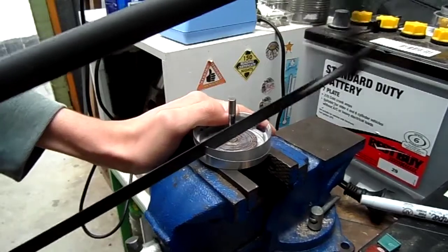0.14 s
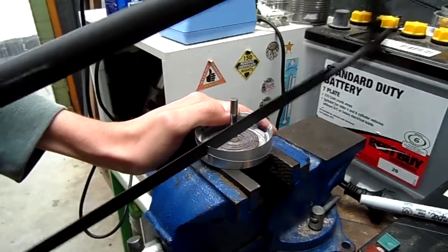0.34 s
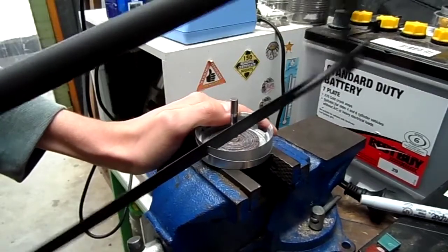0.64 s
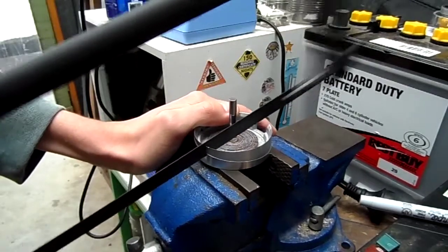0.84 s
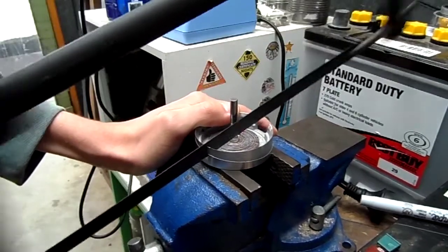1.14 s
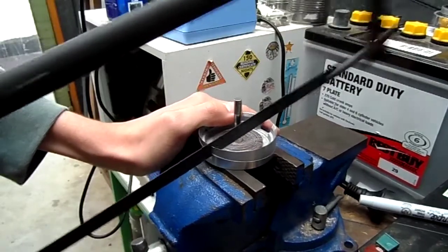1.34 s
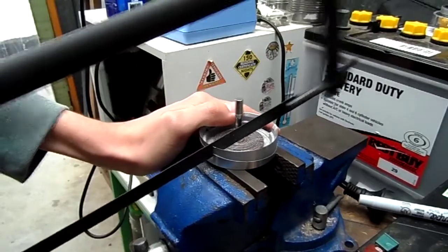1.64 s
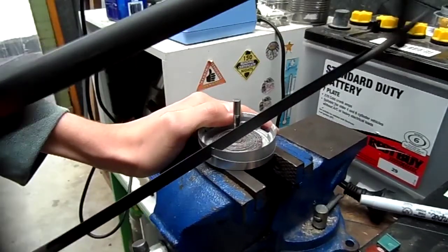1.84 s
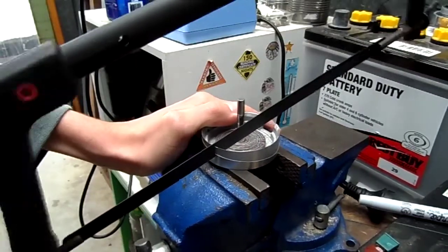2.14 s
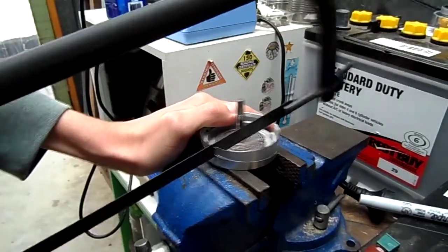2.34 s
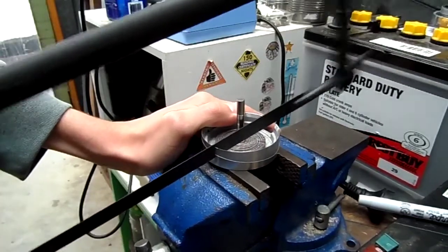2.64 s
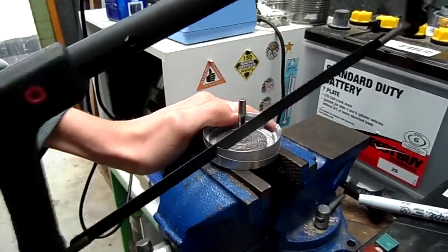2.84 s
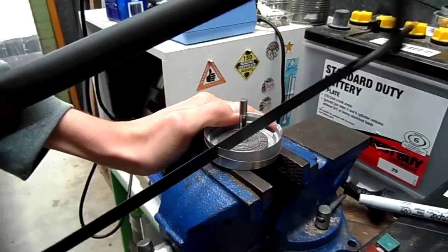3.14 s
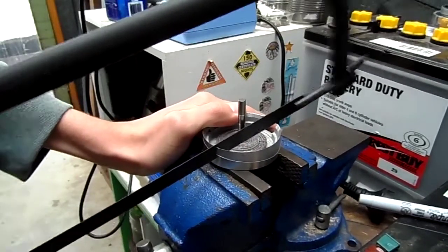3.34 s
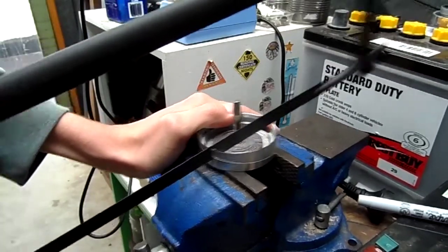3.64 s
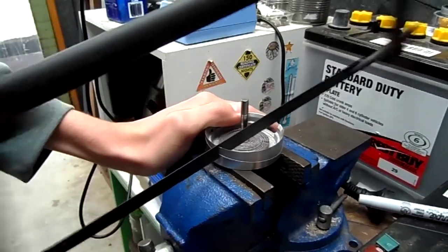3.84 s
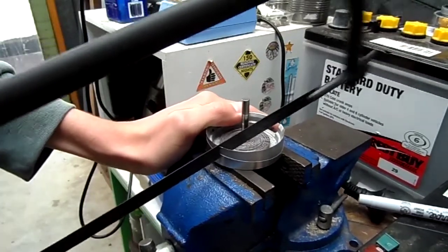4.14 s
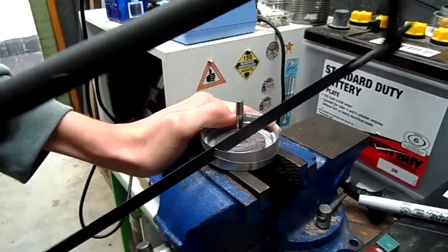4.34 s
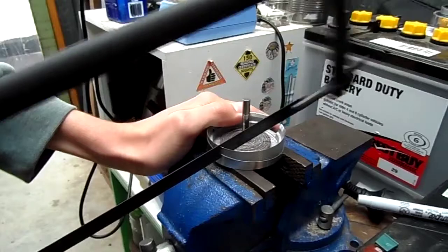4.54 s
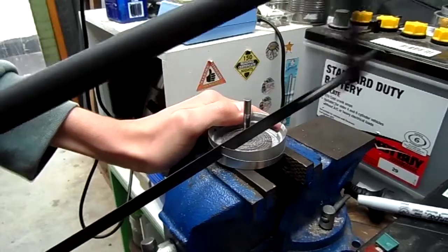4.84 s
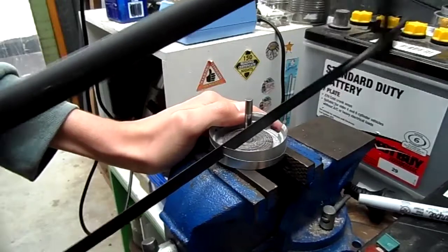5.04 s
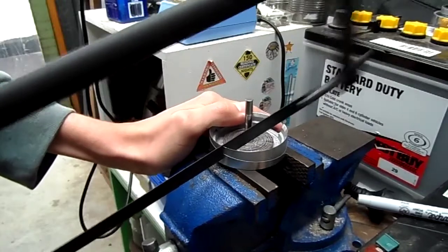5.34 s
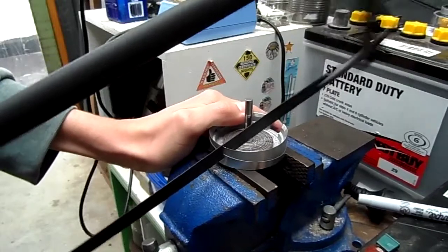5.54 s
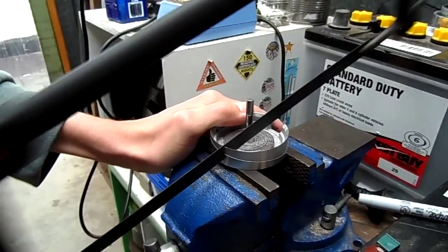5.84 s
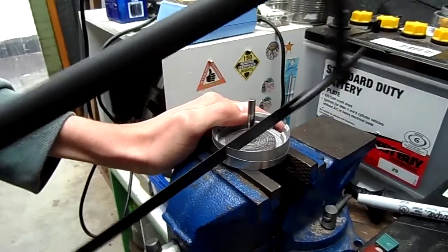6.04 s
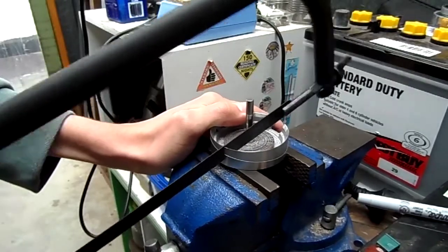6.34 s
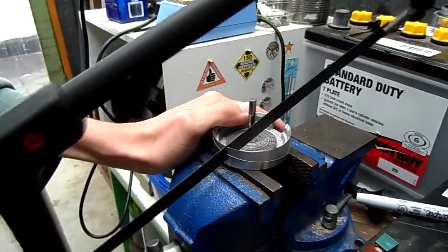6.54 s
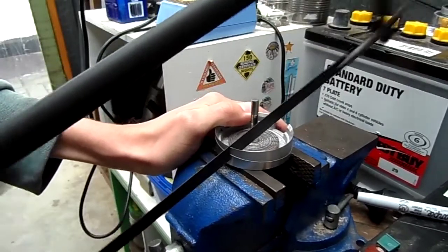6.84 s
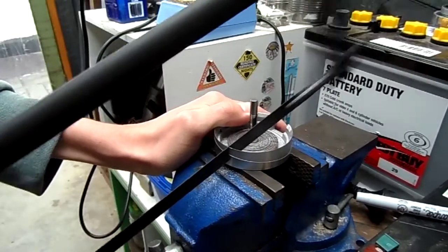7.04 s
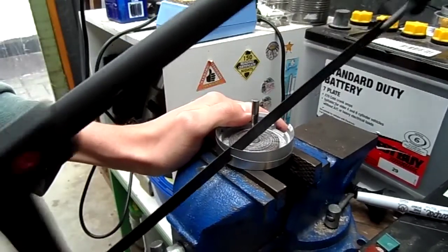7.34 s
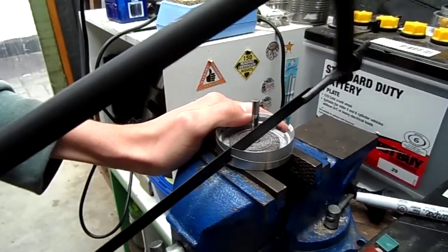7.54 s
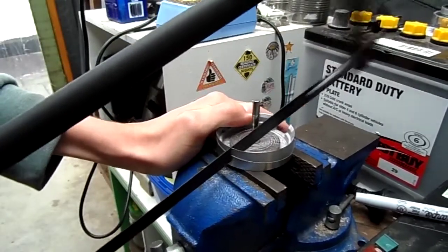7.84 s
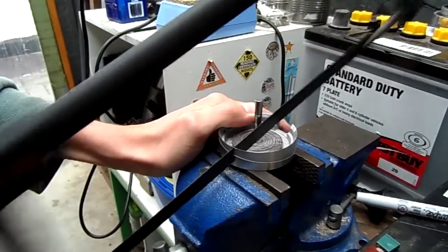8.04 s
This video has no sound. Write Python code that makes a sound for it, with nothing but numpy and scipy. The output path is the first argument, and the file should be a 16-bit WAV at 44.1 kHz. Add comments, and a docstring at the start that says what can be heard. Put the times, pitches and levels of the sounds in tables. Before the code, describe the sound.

From 0 s a hand hacksaw strokes quickly across a small metal drum clamped in a vise, roughly five to six single strokes a second, heard close in a small workshop with a short, faint echo. Every stroke is a bright gritty rasp that swells and fades within about 0.2 s, the blade's ring sliding up on pushes and down on pulls. From 0.2 s the loose frame knocks at many turns, most strongly in the first 2.6 s, and brief hollow or higher squeaky tones sing out mid-stroke. Sudden bites jolt the scrape around 2.8 to 3.4 s and at 4.2 s. Low rumble of hands and bench swells near 3.6 s. Strokes soften around 4.2 to 4.5 s, then regain strength. Sawing carries on steadily, knocks mostly lighter, with rumble strongest as it cuts off mid-work just after 8 s.

```python
"""A hand hacksaw works quickly back and forth across a small metal drum held in a bench vise.
From the start a low handling rumble and faint shop air lie under the first stroke, whose passing
teeth scrape and ring the blade, frame and drum, with a short room echo. From the first turn on the
frame knocks at many turns; from the second stroke on, single modes often sing out as clear tones.
The rumble grows towards the middle and is strongest at the end, where the sawing still goes on."""
import sys
import numpy as np
from scipy import signal
from scipy.fft import rfft, irfft, next_fast_len
from scipy.io import wavfile
from scipy.ndimage import uniform_filter1d

SR = 44100
rng = np.random.default_rng(int(sys.argv[2]) if len(sys.argv) > 2 else 0)


def master(y):
    """Save y as 16-bit WAV."""
    cut = np.clip(np.atleast_2d(y).T, -1, 1)
    pcm = np.round(cut * 32767)  # scale
    wavfile.write(sys.argv[1], SR, pcm.astype(np.int16))


def convert_level_to_amplitude(level_db):
    """Map a level in decibels to its linear amplitude factor."""
    exponent = np.asarray(level_db, float) / 20
    return 10 ** exponent


N = 361179  # length [samples]


def evened(x):
    """Scales a signal to rms 1."""
    return x / np.sqrt(np.mean(x ** 2) + 1e-20)


def read(points, hz):
    """Reads a table of values over frequency, in even steps of pitch."""
    table_hz, value = np.transpose(points)
    return np.interp(np.log(hz + 1), np.log(table_hz + 1), value)


def add(mix, s, sound):
    """Mixes a sound in at time s [s]."""
    part = mix[max(round(s * SR), 0):][:len(sound)]
    part += sound[:len(part)]


def coloured(x, points):
    """Filters a signal by the spectrum of a table and scales it to rms 1."""
    size = next_fast_len(N)
    gain = convert_level_to_amplitude(read(points, np.fft.rfftfreq(size, 1 / SR)))
    return evened(irfft(rfft(x, size) * gain, size)[:N])


def resonate(x, hz, width):
    """Rings like one piece of metal at one pitch; white noise of rms 1 leaves with rms near 1."""
    r = np.exp(-np.pi * width / SR)
    ring = signal.lfilter([1], [1, -r * np.exp(2j * np.pi * hz / SR)], x).real
    return np.sqrt(2) * np.sqrt(1 - r ** 2) * ring


def wander(hz):
    """Slow chance of rms 1, changing about hz times a second."""
    size = max(round(SR / hz / 2), 1)
    noise = rng.standard_normal(N)
    return evened(uniform_filter1d(uniform_filter1d(noise, size), size))


# Rumble strength over time, before a steady lift and chance: (time [s], level [dB])
RUMBLE_LEVEL = [(0.0, -48), (0.5, -47), (0.98, -47), (1.189, -44.5), (2.12, -45.5), (2.9, -42.5),
                (3.01, -41.5), (3.65, -36), (4.08, -40), (4.63, -43), (4.931, -39.5), (5.41, -38),
                (6.59, -39), (6.91, -39.5), (8.05, -37.5), (8.19, -31)]
# Tone colour of the rumble: (frequency [Hz], relative level [dB per Hz])
RUMBLE_COLOUR = [(20, -2), (35, -8), (60, 1.5), (100, -3.5), (160, -9.5), (280, -13), (500, -20),
                 (1500, -84)]
# Tone colour of the air in the shop: (frequency [Hz], relative level [dB per Hz])
AIR_COLOUR = [(60, -10), (150, 0), (400, -5), (800, -10), (1500, -24), (4000, -38), (15000, -52)]


def rumble():
    """Lumpy low noise of hands and bench, with the faint air of the shop above it."""
    s, db = np.transpose(RUMBLE_LEVEL)
    lumps_db = 2.0 * wander(8)
    level_db = np.interp(np.arange(N) / SR, s, db) + lumps_db + 2.5
    low, air = rng.standard_normal((2, N))
    return convert_level_to_amplitude(level_db) * coloured(low, RUMBLE_COLOUR) + convert_level_to_amplitude(-49) * coloured(air, AIR_COLOUR)


# Saw strokes, pulls and pushes in turn, scrape level before the bites:
# (start [s], fastest moment [s], stop [s], scrape level [dB])
STROKES = [(0.0, .098, 0.19, -20), (.164, 0.277, .33, -19.5), (0.333, .414, .5, -18.5),
           (0.505, .607, .67, -19), (.664, 0.747, 0.86, -20), (.833, 0.935, 1.025, -19),
           (1.009, 1.091, 1.177, -18), (1.178, 1.287, 1.364, -19), (1.354, 1.453, 1.538, -20),
           (1.544, 1.624, 1.72, -20.5), (1.712, 1.798, 1.907, -18.5), (1.901, 1.965, 2.09, -18.5),
           (2.061, 2.164, 2.236, -19.5), (2.248, 2.344, 2.404, -18.5), (2.418, 2.52, 2.614, -19),
           (2.607, 2.717, 2.79, -19.5), (2.775, 2.884, 2.963, -19), (2.953, 3.054, 3.123, -18),
           (3.117, 3.219, 3.32, -19), (3.296, 3.416, 3.457, -18.2), (3.46, 3.569, 3.64, -20.5),
           (3.638, 3.74, 3.795, -18.5), (3.823, 3.917, 4, -18), (4.0, 4.082, 4.166, -20.5),
           (4.167, 4.256, 4.365, -24), (4.358, 4.475, 4.533, -24.5), (4.598, 4.665, 4.785, -21),
           (4.773, 4.902, 4.96, -20), (5.002, 5.062, 5.195, -18.5), (5.188, 5.315, 5.38, -21),
           (5.373, 5.473, 5.573, -18.5), (5.565, 5.659, 5.73, -19), (5.731, 5.806, 5.92, -19.5),
           (5.91, 6.008, 6.082, -20), (6.073, 6.154, 6.268, -19.5), (6.262, 6.388, 6.443, -19.5),
           (6.435, 6.539, 6.64, -19), (6.631, 6.73, 6.84, -20.5), (6.808, 6.94, 7.02, -22),
           (7.005, 7.11, 7.18, -20.5), (7.179, 7.289, 7.38, -19), (7.376, 7.522, 7.6, -20),
           (7.594, 7.709, 7.82, -22), (7.81, 7.917, 7.98, -19.5), (7.99, 8.092, 8.17, -18)]


def motion():
    """Turns strokes into arches of speed 0-1, scrape level, place on the blade 0-1 and direction."""
    rise_point, fall_point = 1.285, 1.67  # how pointed the scrape swells and dies
    t = np.arange(N) / SR
    speed, power, place, push = np.zeros((4, N))
    for k, (start, fastest, stop, db) in enumerate(STROKES):
        now = slice(round(start * SR), round(stop * SR))
        turn = np.pi * np.interp(t[now], [start, fastest, stop], [0, .5, 1])
        arch = np.abs(np.sin(turn))
        point = np.where(t[now] < fastest, rise_point, fall_point)
        power[now] += (convert_level_to_amplitude(db) * arch ** point) ** 2
        speed[now] = arch
        push[now] = k % 2
        place[now] = .5 - .5 * np.cos(turn) * (-1) ** k  # a pull runs 0 to 1, a push 1 to 0
    return speed, np.sqrt(power), place, push


def teeth(speed):
    """Each set of three teeth gives a tick of uneven size; chips and rubbing fill in a gritty hiss."""
    set_hz = 930 * speed * (1 + .06 * wander(60))  # three-tooth set patterns per second, slightly uneven
    passed = np.cumsum(set_hz) / SR
    ticks = np.diff(np.floor(passed), prepend=0) * convert_level_to_amplitude(0.93 * rng.standard_normal(N))
    hiss = rng.standard_normal(N) * convert_level_to_amplitude(2.0 * wander(370))
    return (0.25 * evened(ticks) + evened(hiss)) * convert_level_to_amplitude(0.8 * wander(41))


# The teeth suddenly bite deeper (below zero, the dip and jump are reversed):
# (time [s], size of the bite [dB], scaled by the shape below)
BITES = [(.354, -1), (1.732, 2), (1.939, 4), (2.794, 14), (2.973, 8), (3.137, 10), (3.333, 14), (3.835, 4),
         (4.182, 16), (4.61, 2), (5.021, -4), (5.214, 2), (6.13, 6), (6.34, 6), (8.014, -3)]


def bites():
    """Gain that dips while the blade hangs, jumps at the bite and settles."""
    t, db = np.arange(-.03, .06, 1 / SR), np.zeros(N)
    hang = -.7 * np.exp(t / 0.0067)
    settle = 0.5 * np.exp(-t / 0.016)
    shape = np.where(t < 0, hang, settle)
    for s, size_db in BITES:
        add(db, s + t[0], size_db * shape)
    return convert_level_to_amplitude(db)


def slide(x, hz, width):
    """A resonance that follows the curve hz: shift down, smooth twice, shift back; rms 1."""
    turn, r = np.exp(2j * np.pi * np.cumsum(hz) / SR), np.exp(-np.pi * width / SR)
    smooth = signal.lfilter([1], [1, -2 * r, r ** 2], x / turn)
    return evened((turn * smooth).real)


# Tone colour of the broad scrape: (frequency [Hz], relative level [dB per Hz])
SCRAPE_COLOUR = [(60, -35), (150, -27.5), (700, -12.5), (1100, -24), (1400, -19.5), (2400, -9), (3300, -11),
                 (6400, -8.5), (9100, -14), (12000, -9), (14300, -10.5), (15300, -11.5), (15800, -11.5)]
# The blade between cut and frame shortens on a push and its ring slides up, back down on a pull:
# (place on the blade [0-1], frequency [Hz], relative level [dB])
BLADE_SLIDE = [(0, 3350, 4), (.3, 3040, -25), (.55, 2770, -8.5), (.8, 2360, 3.5), (.95, 1940, 2),
               (1, 1450, 13)]
# Modes (natural ringing pitches) of saw and drum: (frequency [Hz], width [Hz],
# relative level on pull [dB], relative level on push [dB], place where it is best driven [0-1])
BODY_MODES = [(642, 51, -17, -16.5, 1), (888.3, 23, -11.5, -13, 0.56), (2136, 83, -20, -18, 0.92),
              (2503, 117, -13.5, -11, 0.7), (2780, 134, -10, -8, 0.34), (3046, 62, -11, -9, 0.54),
              (3640, 130, -30, -13.5, 0.74), (4425, 46, -12, -12.5, 0.38), (5226, 58, -13.5, -20, 0.54),
              (6000, 96, -12.5, -10.5, 0.56), (6277, 180, -10.5, -11.5, 0.4), (6550, 200, -5.5, -6.5, 0.6),
              (6680, 150, -10.5, -15, 0.12), (8100, 104, -12.5, -19, 0.56), (8460, 97, -27, -34, 0.5),
              (11420, 200, -9.5, -10, 0.43), (12500, 110, -43, -33, 0.4), (12900, 510, -6.5, -8, 0.56),
              (14130, 340, -10.5, -11.5, 0.42), (15100, 570, -9, -9.5, 0.6)]
# Modes of the free span of blade: (frequency [Hz], width [Hz],
# relative level on pull [dB], relative level on push [dB], place where it is best driven [0-1])
SPAN_MODES = [(1215, 254, -18.5, -13.5, 0.17), (1587, 57, -15.5, -13, 0.31), (1815, 135, -21, -15.5, 0.37)]


def saw():
    """The teeth drive a broad scrape and the modes, each best at its own place along the blade."""
    speed, level, place, push = motion()
    level = level * bites()
    rasp = evened(teeth(speed))
    where, hz_at, db_at = np.transpose(BLADE_SLIDE)
    slide_hz = np.interp(place, where, hz_at)
    load_db = -14.0 * (1.5 - push)  # the push loads the blade
    slide_gain = convert_level_to_amplitude(np.interp(place, where, db_at) + load_db + 2.8 * wander(33))
    main_ring = convert_level_to_amplitude(-13) * slide(rasp, slide_hz, 420)
    low_ring = convert_level_to_amplitude(-19) * slide(rasp, .32 * slide_hz, 100)
    blade = slide_gain * (main_ring + low_ring)
    out = level * (convert_level_to_amplitude(1.0) * coloured(rasp, SCRAPE_COLOUR) + 0.88 * blade)
    for k, (hz, width, pull_db, push_db, best) in enumerate(list(BODY_MODES) + list(SPAN_MODES)):
        stroke_db = pull_db + push * (push_db - pull_db)
        grip_db = stroke_db - 35 * (place - best) ** 2 + 2.72 * wander(27.4)
        # every other mode is turned upside down
        out += (-1) ** k * resonate((rasp + blade) * level * convert_level_to_amplitude(grip_db), hz, width)
    # slow teeth lose their treble: below 0.38 of full speed it fades out above 7100 Hz
    dull = signal.sosfiltfilt(signal.butter(2, 7100, fs=SR, output="sos"), out)
    return dull + (out - dull) * np.clip(speed / 0.38, 0, 1)


# How long the room echo takes to fall by 60 dB: (frequency [Hz], fall time [s])
ROOM_DECAY = [(200, 0.39), (1000, 0.54), (4000, 0.18), (15000, 0.18)]


def room(x):
    """Echoes as sparse taps of random sign, each band of pitch dying at its own speed."""
    taps = np.zeros(SR // 2)
    at = np.arange(200, len(taps) - 20, 20)
    taps[at + rng.integers(0, 20, len(at))] = rng.choice([-1., 1.], len(at))
    hz, t, bands = signal.stft(taps, SR, nperseg=256)
    fade = convert_level_to_amplitude(-60 * t / read(ROOM_DECAY, hz)[:, None])
    tail = signal.istft(bands * fade, SR, nperseg=256)[1]
    return signal.fftconvolve(x, tail / np.linalg.norm(tail))[:N]


# Modes that lock faintly by chance near the fastest moment, before a small random detune and spread:
# (frequency [Hz], share of strokes [0-1], level over the stroke's scrape level [dB])
FAINT_MODES = [(669.7, .08, -9), (908, .3, -9), (2190, .3, -10), (2760, .3, -9.5), (2970, .18, -13)]


def faint_sings():
    """Draws by chance, for every stroke and mode, faint tones as rows like those of SINGS."""
    rows = []
    for _, fastest, _, scrape_db in STROKES:
        for hz, share, mode_db in FAINT_MODES:
            late, sharp, loud = rng.standard_normal(3)
            if rng.random() < share:
                middle = fastest + .016 * late
                db = scrape_db + mode_db + 2.0 * loud
                rows.append((middle, hz * (1 + .012 * sharp), db, .016))
    return rows


# The frame knocks as the blade takes up the load:
# (time [s], relative level [dB], sharpness [0-1], crack level over the knock's level [dB])
KNOCKS = [(0.176, -16, 0.8, 13), (0.515, -14, 0.42, 0), (1.19, -15, 0.1, -4), (1.556, -9, 0.63, -3),
          (1.896, -15, 0.32, -11), (2.258, -12, 0.3, -13), (2.616, -16, 0.44, -10), (2.959, -23, 0.35, -3),
          (3.306, -17, 0.33, -20), (3.643, -23.5, 0.38, -8), (3.953, -23.5, 0.53, -1),
          (4.651, -17.5, 0.36, -8), (5.063, -13, 0.44, -3), (5.903, -24, 0.64, -12),
          (6.269, -25.5, 0.45, 8), (6.631, -19.5, 0.52, -15), (7.015, -17.5, 0.52, -22),
          (7.376, -28, 0.55, -6), (7.819, -25.5, 0.5, -10)]
# Low modes rung by a knock, before each knock's own pitch scale and tilt; the bench under the vise
# swings up late: (frequency [Hz], relative level [dB], time to fall by 60 dB [s], rise time [s])
KNOCK_MODES = [(88, -6, 0.1, 0.0093), (159.5, -1, 0.11, 0.0096), (246, -7.5, 0.058, 0.005),
               (318, 4, 0.022, 0.00066), (429, -4.5, 0.054, 0.00063), (620, -3, 0.029, .0005),
               (763, -4, 0.019, 0.00044), (1410, -8, 0.023, 0.00033), (2150, -10, 0.012, .0003)]


def knocks():
    """A light touch, the blow with its crack, and loose bounces ring the frame's low modes."""
    t = np.arange(round(.12 * SR)) / SR
    out, blow = np.zeros(N), round(0.002514 * SR)  # the blow follows the touch [samples]
    for s, db, sharp, crack_db in KNOCKS:
        hits = np.zeros(round(.06 * SR))
        hits[[0, blow]] = -.15, 1
        delays = np.cumsum(.003 + .007 * rng.random(5))  # bounces after the blow [s]
        signs = np.sign(rng.random(5) - .5)
        hits[blow + (delays * SR).astype(int)] = 0.71 * np.exp(-delays / 0.023) * signs
        pitch = 0.944 + 0.14 * rng.random()
        ring = np.zeros(len(t))
        for hz, mode_db, t60, rise in KNOCK_MODES:
            tilt_db = -7.5 * (0.5 - sharp) * np.log2(hz / 150)  # a sharp knock is brighter
            swell = convert_level_to_amplitude(mode_db + tilt_db - 60 * t / t60) * (1 - np.exp(-t / rise))
            ring += swell * np.cos(2 * np.pi * hz * pitch * t)
        snap = -np.exp(-((t - .0003) / .00009) ** 2)  # metal meets metal for a tenth of a millisecond
        fizz = .5 * np.exp(-t / 0.0011) * uniform_filter1d(rng.standard_normal(len(t)), size=4)
        add(out, s, convert_level_to_amplitude(db) * signal.fftconvolve(hits, ring))
        add(out, s + 0.00289, convert_level_to_amplitude(db + crack_db) * (snap + fizz))
    return out


# The clearest moments when the teeth lock onto one mode and it sings, before small flutters:
# (middle [s], frequency [Hz], level at the middle [dB], half length [s])
SINGS = [(0.254, 2716, -22.5, 0.029), (0.419, 908, -29, 0.027), (.59, 916, -25.5, .023),
         (.591, 2753, -15, 0.017), (.75, 894, -18.5, .015), (0.936, 2740, -19, .021),
         (1.09, 904, -17.5, 0.025), (1.276, 2740, -16.5, 0.024), (1.458, 907, -24, 0.03),
         (1.631, 2817, -23.5, .031), (1.776, 2809, -27, 0.037), (1.788, 914, -27, 0.02),
         (1.952, 2450, -22, 0.011), (1.973, 2760, -19.5, 0.013), (2.185, 892, -18, 0.031),
         (2.344, 2820, -24, 0.026), (2.567, 878, -24.5, 0.023), (2.663, 2208, -25.5, 0.025),
         (2.684, 906, -25.5, 0.024), (2.693, 2800, -27, 0.057), (2.893, 891, -20, 0.049),
         (3.012, 2538, -20, 0.016), (3.027, 883, -25, 0.026), (3.035, 2787, -26, .025),
         (3.197, 2872, -27.5, .038), (3.213, 884, -18, .018), (3.362, 2744, -24, 0.017),
         (3.414, 889, -25, .028), (3.748, 2800, -23, .014), (3.919, 893, -23, .034),
         (4.079, 907, -22, .013), (4.085, 2814, -21.5, 0.016), (4.713, 897.5, -26, 0.011),
         (4.895, 2860, -27, 0.039), (5.092, 900, -24, .016), (5.296, 905, -27, .032),
         (5.297, 2783, -19.5, 0.015), (5.503, 899, -21.5, .022), (5.653, 2716, -21.5, .02),
         (5.662, 911, -26.5, .035), (6.019, 2810, -21.5, .019), (6.136, 2788, -19.5, 0.011),
         (6.174, 906, -26.5, .021), (6.553, 929, -19, .013), (6.727, 2767, -17.5, 0.018),
         (6.897, 2799, -25.5, .024), (6.955, 903, -27, 0.031), (7.1, 2692, -18.5, 0.015),
         (7.239, 2824, -26.5, 0.016), (7.294, 900, -17.5, 0.014), (7.506, 893, -21.5, 0.024),
         (7.879, 2325, -23, .015), (8.12, 903, -23, 0.046)]


def singing():
    """A locked mode, clear or faint, swells and dies as a slightly unsteady tone."""
    out = np.zeros(N)
    wobble, flutter, chatter = wander(38.3), wander(49), wander(82)
    for s, hz, db, half in list(SINGS) + faint_sings():
        t = np.arange(-2 * half, 2 * half, 1 / SR)
        now = np.clip(np.round((s + t) * SR).astype(int), 0, N - 1)
        unsteady_db = 0.0011 * hz * flutter[now] + 1.83 * chatter[now]
        swell_db = db - 10.5 * (t / half) ** 2 + unsteady_db
        phase = 2 * np.pi * (hz * t + rng.random()) + (0.51 + 0.0003 * hz) * wobble[now]
        add(out, s + t[0], np.sqrt(2) * convert_level_to_amplitude(swell_db) * np.sin(phase))
    return out


def scene():
    """Saw, knocks and singing modes with their room echo, over the rumble."""
    near = saw() + knocks() + singing()
    return (near + convert_level_to_amplitude(-13) * room(near) + rumble())[None]


def top_cut(x):
    """Nothing passes above the cut-off."""
    return signal.sosfilt(signal.butter(12, 16170, fs=SR, output="sos"), x)


def record(dry):
    """The small microphone rounds off the peaks, then a steep filter removes the top treble."""
    rounded = 1.1 * np.tanh(dry / 1.1)
    low_pass = signal.firwin(511, 15850, window=("kaiser", 9), fs=SR)  # edge [Hz]
    finished = signal.oaconvolve(rounded, low_pass[None], "same")
    return top_cut(finished)


dry = scene()
out = record(dry)
master(out)
```